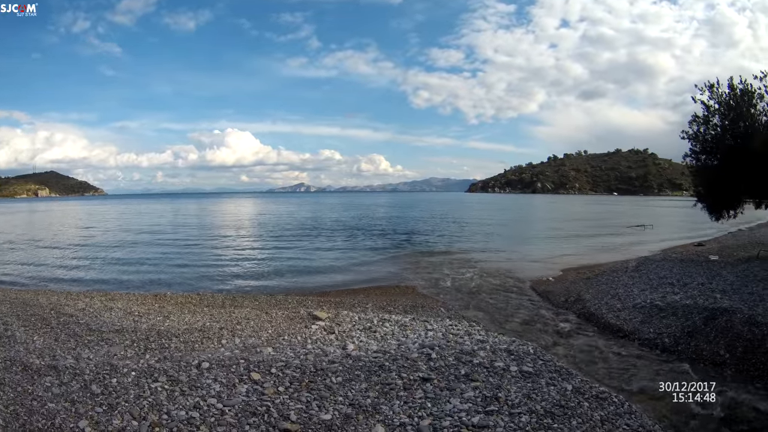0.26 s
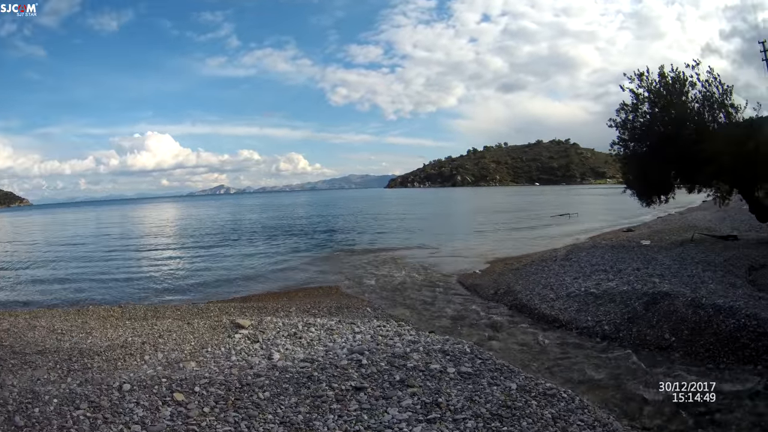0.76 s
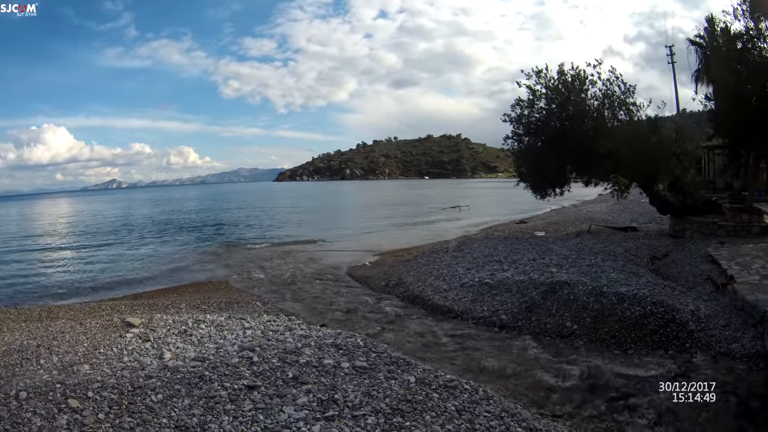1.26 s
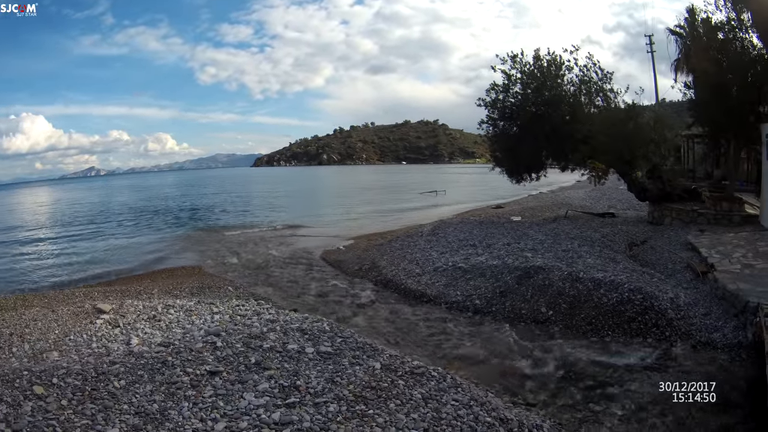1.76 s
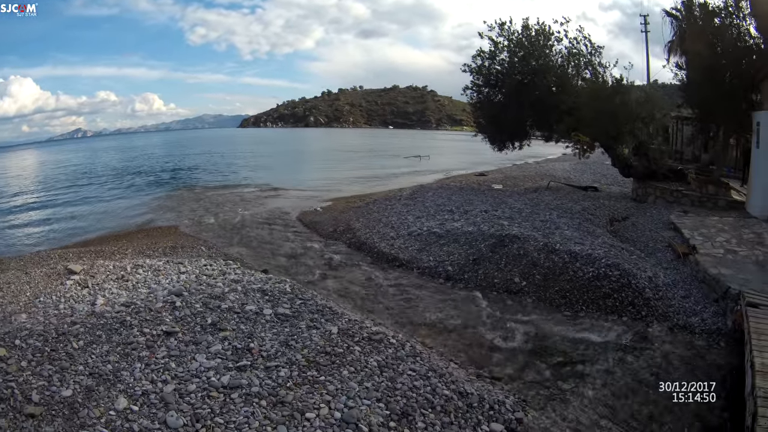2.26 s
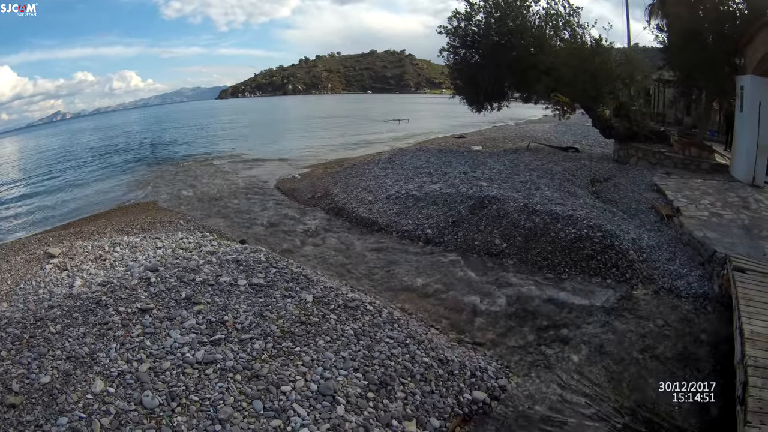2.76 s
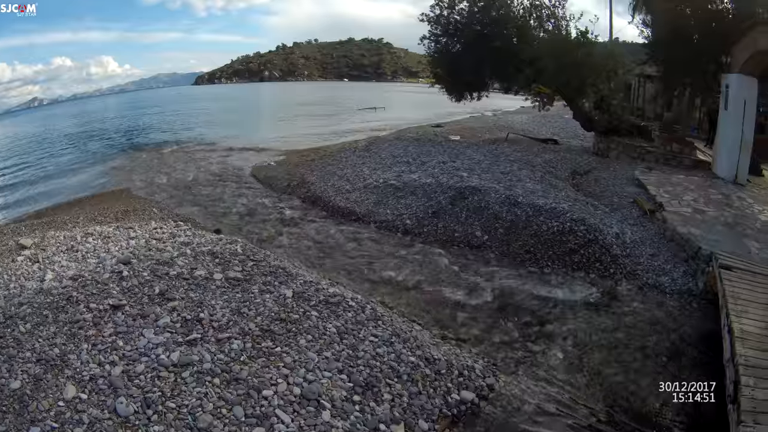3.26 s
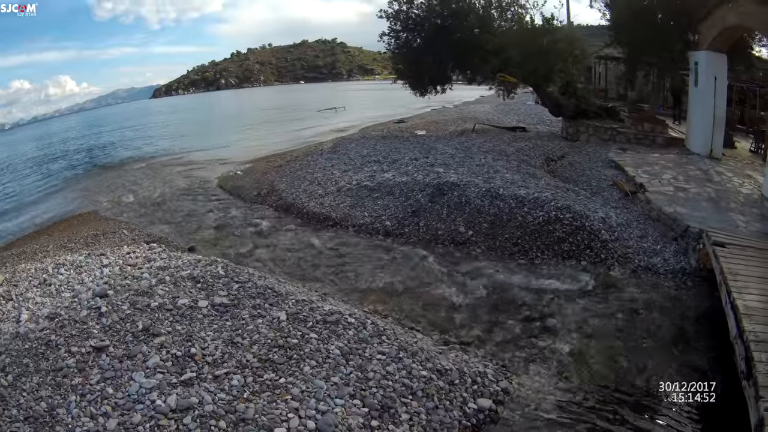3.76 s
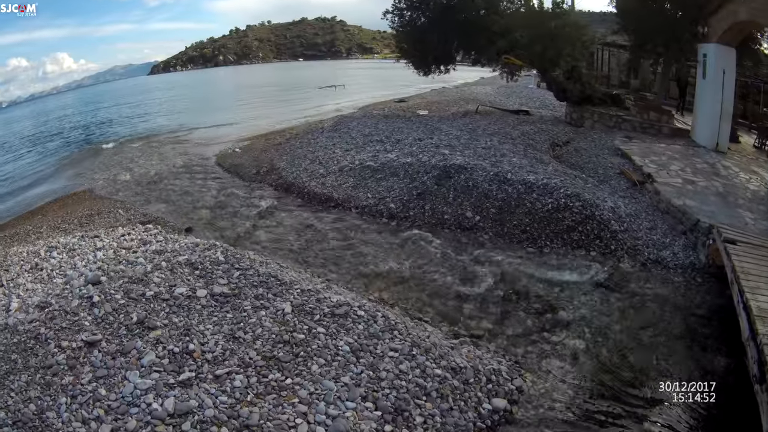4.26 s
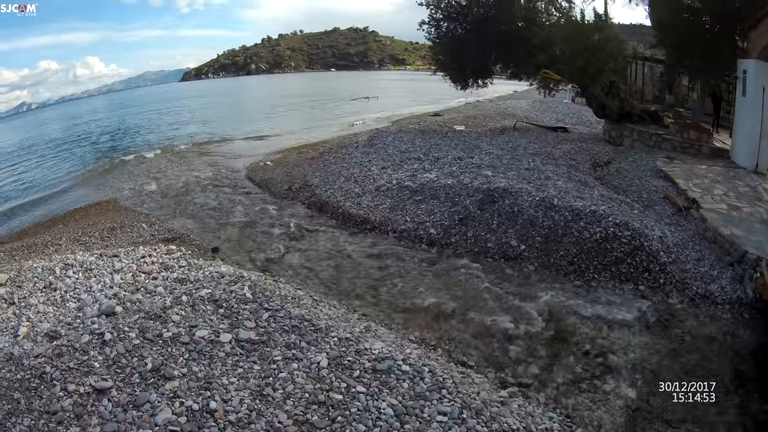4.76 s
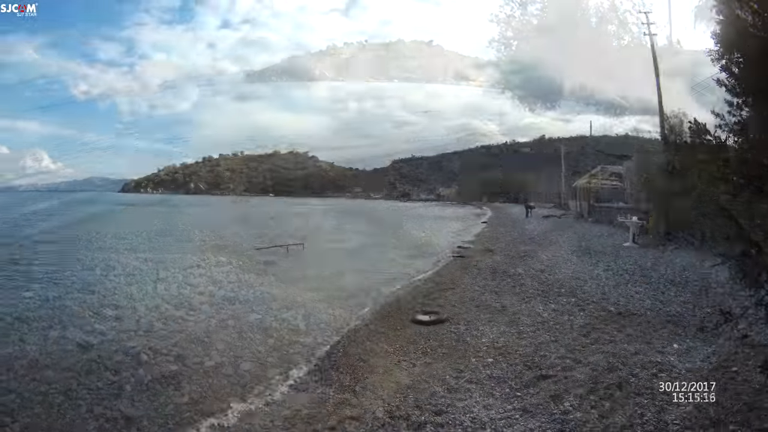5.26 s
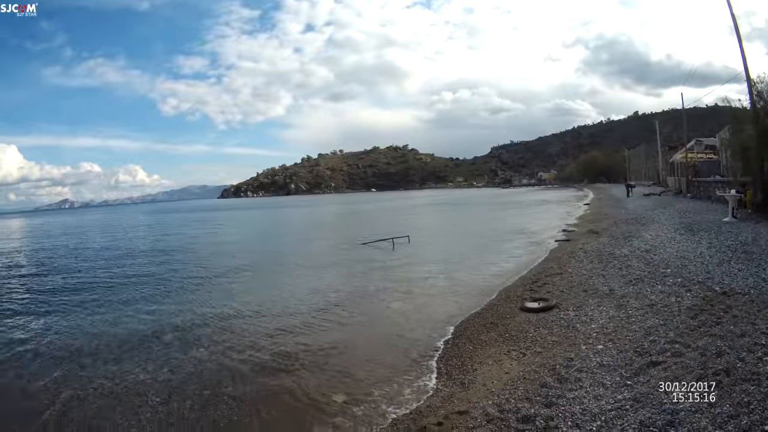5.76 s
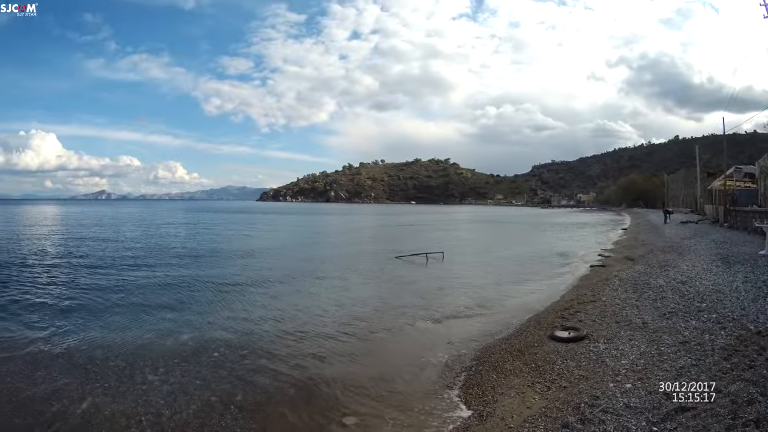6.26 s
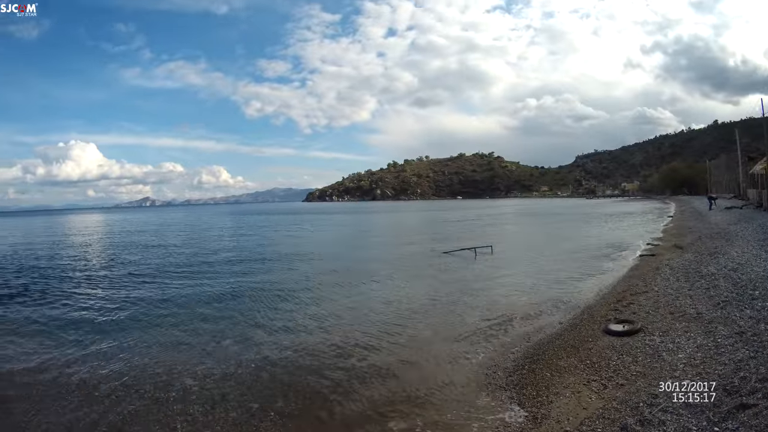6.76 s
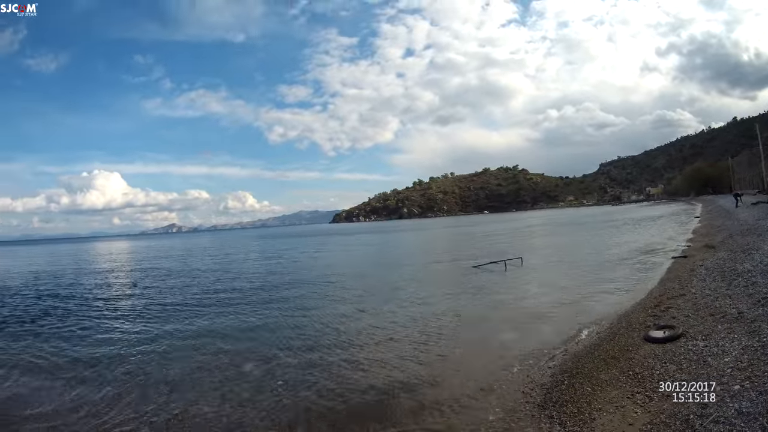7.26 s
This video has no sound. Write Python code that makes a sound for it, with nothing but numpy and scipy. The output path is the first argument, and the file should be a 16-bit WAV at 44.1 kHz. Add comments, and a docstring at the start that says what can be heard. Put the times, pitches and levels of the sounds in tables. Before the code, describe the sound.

Close bubbling water rushes across gravel, casing clicks and hand rubs cutting through, before loud low wind buffeting takes over with faint wavelets behind.

```python
"""A small stream runs over pebbles into a calm sea, close to a hand-held camera: noise and dying bubble tones.
It fades out in a dissolve to a windy shore, where far wavelets lap faintly as patchy noise with a fizz.
Wind on the microphone port is low noise, light at first and strong on the shore.
At the camera body itself, ticks ring the casing, bumps swing it, and a hand rubs and squeaks on the plastic."""
import sys
import numpy as np
from scipy import signal
from scipy.fft import rfft, irfft
from scipy.io import wavfile
from scipy.ndimage import uniform_filter1d

SR = 44100
rng = np.random.default_rng(int(sys.argv[2]) if len(sys.argv) > 2 else 0)


def wav_out(sig):
    """Save sig, one row per channel (or a flat mono array), as 16-bit PCM at SR to the path in sys.argv[1]."""
    wavfile.write(sys.argv[1], SR, np.round(np.clip(np.atleast_2d(sig).T, -1, 1) * 32767).astype(np.int16))


N = 330750  # 7.5 s
HISS_TOP_HZ = 15330  # coloured noise stops here
EDGE_HZ = 16441  # band limit of the whole sound


def gain_of(db):
    """Amplitude factor of a level in dB."""
    return 10 ** (np.asarray(db) / 20)


def evened(x):
    """Scales a sound to an RMS of one."""
    return x / np.sqrt(np.mean(x ** 2) + 1e-20)


def smoothed(x, size):
    """Two running means in a row."""
    return uniform_filter1d(uniform_filter1d(x, size=size), size=size)


def read(points, hz):
    """Value of a spectrum, straight on a log-frequency axis."""
    f, value = np.transpose(points)
    return np.interp(np.log(hz + 1), np.log(f + 1), value)


def columns(rows):
    """Each column of a curve at every sample."""
    s, *rest = np.transpose(rows)
    return [np.interp(np.arange(N) / SR, s, c) for c in rest]


def add(mix, s, sound):
    """Adds a sound to the mix from s seconds on."""
    part = mix[round(s * SR):][:len(sound)]
    part += sound[:len(part)]


def coloured(x, points):
    """Shapes a flat sound to the spectrum points, at an RMS of one."""
    hz = np.fft.rfftfreq(N, 1 / SR)
    spectrum = rfft(x) * gain_of(read(points, hz)) * (hz < HISS_TOP_HZ)
    return evened(irfft(spectrum, N))


def tilted(x, hz, db):
    """Raises what lies above hz by the curve db."""
    low = signal.sosfiltfilt(signal.butter(2, hz, fs=SR, output="sos"), x)
    return low + gain_of(db) * (x - low)


def ringing(x, hz, width_hz):
    """One resonance."""
    return signal.lfilter(*signal.iirpeak(hz, hz / width_hz, SR), x)


def wash(patchy_db, flicker_db, size=256):
    """White noise with drifting patches and a flicker shared by all pitches."""
    frames = 4 * N // size + 5
    a, b, patches = rng.standard_normal((frames, size // 2 + 1, 3)).T
    patches = uniform_filter1d(patches, size=7, axis=0)  # across pitch
    patches = evened(uniform_filter1d(patches, size=24, axis=1))  # across time
    flicker = evened(uniform_filter1d(rng.standard_normal(frames), size=9))
    z = (a + 1j * b) * gain_of(patchy_db * patches + flicker_db * flicker)
    return evened(signal.istft(z, nperseg=size, noverlap=3 * size // 4)[1][:N])


def grains(per_s, spread_db, cycles, glide, low_hz, high_hz, count=26):
    """Short dying tones of many pitches at random moments, flat in sum; a few are large."""
    struck = rng.random(N) < per_s / SR
    size = gain_of(spread_db * np.minimum(rng.exponential(1, N), 4)) * struck
    kind, out = rng.integers(0, count, N), np.zeros(N)
    for k, hz in enumerate(np.geomspace(low_hz, high_hz, count)):
        turns = np.arange(0, 4 * cycles, hz / SR)
        tone = np.sin(2 * np.pi * turns * (1 + glide * turns / cycles))
        tone = tone * (1 - np.exp(-turns)) * np.exp(-2 * turns / cycles)
        tone = tone * np.sqrt(hz) / np.linalg.norm(tone)
        out += signal.oaconvolve(size * (kind == k), tone)[:N]
    return evened(out)


# The far shore. Each row: time in seconds, level in dB, fizz above 650 Hz against the low wash in dB.
SHORE_LEVELS = [(4.95, -45, 0), (5.3, -32, 29), (5.55, -31.5, 7), (5.75, -33, 2), (5.9, -40, 2),
                (6.15, -36.5, 3), (6.45, -40, 2), (6.71, -37, 0), (6.95, -45, -11), (7.19, -31, 0),
                (7.23, -41, -2), (7.5, -41.5, -3)]
# Spectrum of the wavelets. Each row: frequency in Hz, relative level in dB per Hz.
SHORE_SPECTRUM = [(240, -22), (400, -5.5), (585, -8.5), (982, -5.5), (1040, -7.5), (1270, -10), (1830, -9),
                  (2170, -3.5), (3750, -6), (5000, -3), (13300, -29.5), (15200, -32)]


def shore():
    """Wavelets on gravel, far and soft: patchy noise and a fizz of small dying tones."""
    fizz = grains(per_s=1200, spread_db=2.5, cycles=4.4, glide=.03, low_hz=800, high_hz=13500)
    water = wash(patchy_db=2.45, flicker_db=1.0) + gain_of(-8) * fizz
    level_db, fizz_db = columns(SHORE_LEVELS)
    # the fizz keeps its level and the low wash moves against it
    water = tilted(coloured(water, SHORE_SPECTRUM), 650, fizz_db) / gain_of(fizz_db)
    begun = np.arange(N) > SHORE_LEVELS[0][0] * SR
    return gain_of(level_db) * begun * water


# Bumps on the camera body. Each row: start in seconds, level in dB,
# pitch of the swing in Hz, time for the swing to die by 60 dB in seconds.
BODY_BUMPS = [(0.539, -21.5, 61, 0.05), (1.289, -33, 50, 0.074), (1.689, -28, 48, 0.098)]


def bumps():
    """A quick push, then a low swing of the body."""
    out, t = np.zeros(N), np.arange(6000) / SR
    for s, db, hz, t60 in BODY_BUMPS:
        push = 4.2 * np.sin(2 * np.pi * 150 * t) * np.exp(-t / 0.0014)
        decay = gain_of(-60 * np.maximum(t - .02, 0) / t60)
        swing = -np.sin(2 * np.pi * hz * t) * (1 - np.exp(-t / 0.01)) * decay
        add(out, s, gain_of(db) * (push + swing))
    return out


# Thin squeaks close at the casing. Each row: start in seconds, peak in dB, pitch in Hz, length in seconds.
SKIN_SQUEAKS = [(4.396, -48, 11200, 0.01), (5.94, -42, 13300, .03)]


def squeaks():
    """Skin squeaks on plastic: a short high sine that swells and fades."""
    out = np.zeros(N)
    for s, db, hz, length in SKIN_SQUEAKS:
        t = np.arange(0, length, 1 / SR)
        add(out, s, gain_of(db) * np.sin(2 * np.pi * hz * t) * np.hanning(len(t)))
    return out


# Ticks of the casing, right at the microphone. Each row: start in seconds, peak in dB,
# pitch in Hz, bare slips against the ring in dB.
CASING_TICKS = [(0.557, -14, 4340, -7), (0.6035, -9.5, 4000, -10), (0.726, -14, 4610, -14),
                (1.119, -11, 3140, -14), (1.2136, -14, 6190, -15), (1.229, -10, 4010, 0),
                (1.7592, -11, 2600, 6), (1.848, -16, 4170, 3), (1.9558, -13, 2640, -17),
                (2.693, -10.5, 4200, -21), (3.279, -11.5, 3950, -13), (3.807, -11, 4400, -17),
                (4.1964, -3.5, 5360, -24), (4.2122, -7, 5500, -20), (4.2313, -13, 5050, -10),
                (4.2504, 0, 4890, -8), (4.28, -17.5, 4270, -13), (4.3081, -20, 4230, -10),
                (4.3924, -4, 4330, -21), (4.4744, -15, 4200, -10), (4.4862, -1.2, 4280, -3),
                (4.5348, -9, 4080, -14), (4.572, -15, 4900, -16), (4.6351, -5, 4100, 13),
                (4.69, -15, 4520, -4), (4.7326, -11, 4800, -15), (4.7647, -13, 4700, -14),
                (4.8148, -8.5, 4670, -13), (4.9042, -11, 4640, -16), (5.492, -17, 4540, -12),
                (6.0312, -15, 4700, -10), (6.3465, -24, 5170, -12), (7.295, -22.5, 4690, 1),
                (7.3188, -30, 4970, 3), (7.344, -26, 4200, 0), (7.3913, -18, 4380, -11),
                (7.4098, -29, 2500, 8), (7.467, -29, 4560, 2), (7.489, -18, 4670, -16)]
# Resonances of the casing. Each row: factor on the tick's pitch, width in Hz, level in dB.
CASING_MODES = [(1.025, 420, 16.5), (1.19, 1000, 9), (1.37, 340, -5), (1.75, 1400, -5)]
TICK_T60_S, TICK_RISE_S = 0.0084, 0.00045  # how the flurry of slips dies by 60 dB and sets in


def ticks():
    """A quick flurry of slips rings the plastic casing; the first slips are also heard bare."""
    out, t = np.zeros(N), np.arange(1300) / SR
    flurry = gain_of(-60 * t / TICK_T60_S) * (1 - np.exp(-t / TICK_RISE_S)) ** 2
    bare_band = signal.butter(2, (2500, 10500), "band", fs=SR, output="sos")
    noises = rng.standard_normal((len(CASING_TICKS), len(t)))
    for (s, db, hz, bare_db), noise in zip(CASING_TICKS, noises):
        slips = noise * flurry
        ring = np.zeros(len(t))
        for factor, width_hz, mode_db in CASING_MODES:
            mode = ringing(slips, hz * factor, width_hz)
            ring += gain_of(mode_db) * ringing(mode, hz * factor, 2.7 * width_hz)
        bare = signal.sosfilt(bare_band, slips * np.exp(-t / 0.00028))
        tick = ring / abs(ring).max() + gain_of(bare_db) * bare / abs(bare).max()
        add(out, s, gain_of(db) * tick / abs(tick).max())
    return out


# Rubs of the hand along the casing. Each row: start in seconds, length in seconds, rise in seconds,
# first level in dB, last level in dB, treble above 5 kHz against the level in dB.
HAND_RUBS = [(.53, 0.11, .003, -32, -26, -6), (0.698, 0.037, .003, -22, -35, -9),
             (1.086, 0.1, .025, -18.5, -34, -2.5), (1.217, 0.035, .003, -38, -30, -7),
             (3.267, 0.032, 0.016, -30, -29, 6), (4.192, 0.039, .005, -22, -36, 3),
             (4.424, 0.064, .003, -44, -9, -7), (5.757, 0.18, .045, -32, -44, 9),
             (5.919, .2, 0.035, -27.5, -30.5, -4), (6.193, 0.041, .012, -24.5, -34.5, 1.5),
             (6.714, 0.49, 0.0067, -28.5, -31.5, -2)]
# Spectrum of skin on the casing. Each row: frequency in Hz, relative level in dB per Hz.
RUB_SPECTRUM = [(290, -19), (500, -14), (824, -11.5), (1050, -14.5), (1250, -15), (2980, -8.5), (3300, -12),
                (4850, 0), (6010, -7), (10500, -18), (15200, -32)]
LIFT_S, RUB_FLUTTER_DB = 0.008, 1.5  # how fast the skin lifts; how unevenly it presses


def rubs():
    """Skin slips on plastic: dense tiny clicks in a hiss, stopping quickly as the skin lifts."""
    slips = grains(per_s=2100, spread_db=2.5, cycles=1.2, glide=.01, low_hz=1490, high_hz=13900)
    skin = coloured(wash(patchy_db=2.0, flicker_db=-0.5) + gain_of(-7.0) * slips, RUB_SPECTRUM)
    flutter = evened(smoothed(rng.standard_normal(N), 600))
    stroke, treble_db, t = np.zeros(N), np.zeros(N), np.arange(N) / SR
    for s, length, rise, first_db, last_db, bright_db in HAND_RUBS:
        touch = np.clip(np.minimum((t - s) / rise, (s + length - t) / LIFT_S), 0, 1)
        stroke += touch * gain_of(np.interp(t, (s, s + length), (first_db, last_db)))
        treble_db += (touch > 0) * bright_db
    return stroke * gain_of(RUB_FLUTTER_DB * flutter) * tilted(skin, 5000, treble_db)


# Slow strength of the wind on the microphone port. Each row: time in seconds,
# level before the soft limit in dB, rumble above 103 Hz against the level in dB.
WIND_LEVELS = [(0, -51.5, 14), (.5, -45, 9), (1.1, -46.5, 4), (1.5, -42, -4), (2.0, -44, 3), (2.8, -47, 3),
               (3.3, -40, 4), (3.9, -42, -2), (4.25, -49, -3), (4.55, -33, 2), (4.95, -32, -5),
               (5.26, -19, 4.5), (5.52, -13.5, 10.5), (5.9, -11.5, -3.5), (6.2, -15, 10.5),
               (6.55, -13.5, -1), (6.8, -9, 0.5), (7.2, -13.5, 7), (7.5, -9.5, 2)]
# Spectrum of the wind. Each row: frequency in Hz, relative level in dB per Hz.
WIND_SPECTRUM = [(8.2, -58), (14, -1.5), (38, 6.5), (65, -1), (83, -6), (225, -30), (252, -32.5),
                 (302, -40.5), (378, -45), (400, -49), (520, -82), (880, -120)]
# Short swells of the low wind rumble. Each row: middle in seconds,
# peak level before the soft limit in dB, length in seconds.
RUMBLE_SWELLS = [(0.133, -34, .12), (0.58, -33, .08), (1.292, -29, 0.11), (1.41, -31.5, 0.13),
                 (1.738, -33, 0.25), (2.05, -30, 0.091), (2.214, -35, 0.077), (2.558, -36, 0.081),
                 (2.705, -38, .14), (3.18, -39, 0.14), (4.02, -33, 0.12), (4.397, -31, 0.25),
                 (4.59, -23, 0.073), (4.703, -24.5, 0.17), (4.85, -24.5, 0.14), (5.532, -17, 0.068),
                 (5.66, -10, .12), (5.766, -14, 0.043), (5.853, -16, 0.14), (5.972, -8, 0.067),
                 (6.094, -5, 0.11), (6.243, -8, 0.047), (6.417, -7, .08), (6.49, -12, 0.081),
                 (6.611, -12, 0.047), (7.07, -4, 0.047), (7.199, -1.5, 0.08), (7.4, -13.5, .16)]
SWELL_UPPER_DB = -13  # a swell's rumble above 77 Hz against its level
SOFT_LIMIT = 0.75  # level at which the wind's peaks are softly rounded


def wind():
    """Eddies push on the port: lumpy low noise with an upper rumble, its peaks softly rounded."""
    level_db, upper_db = columns(WIND_LEVELS)
    swells = np.zeros(N)
    for s, db, length in RUMBLE_SWELLS:
        add(swells, s - length / 2, gain_of(db) * np.hanning(round(length * SR)))
    # the last point sets a faint floor above the rumble
    eddies = coloured(rng.standard_normal(N), WIND_SPECTRUM + [(900, -93)])
    size = np.sqrt(abs(smoothed(eddies ** 2, 2000)))
    eddies = evened(eddies / (size + 0.13) ** 0.47)  # chance swings in size are partly evened
    lumps_db = 1.5 * evened(smoothed(rng.standard_normal(N), 1500))  # small eddies come in lumps
    slow = gain_of(level_db) * tilted(eddies, 103, upper_db)
    pushed = slow + swells * tilted(eddies, 77, SWELL_UPPER_DB)
    return tilted(SOFT_LIMIT * np.tanh(pushed / SOFT_LIMIT), 140, lumps_db)


# The clearest bubbles, near the microphone. Each row: start in seconds,
# level before the rise and decay in dB, starting pitch in Hz.
CLEAR_BUBBLES = [(0.159, -20, 990), (0.305, -22, 930), (0.364, -25.5, 500), (0.6, -25, 500),
                 (0.627, -19, 1580), (0.716, -23, 840), (0.796, -19, 1600), (1.146, -15, 1700),
                 (1.189, -22, 508), (1.286, -20, 1680), (1.326, -20, 1650), (1.421, -15, 1570),
                 (1.493, -16, 1420), (1.551, -14, 2180), (1.664, -22, 656), (1.776, -14, 2680),
                 (2.108, -17, 2600), (2.17, -16, 2600), (2.317, -17, 1700), (2.476, -20, 855),
                 (2.756, -16, 1560), (3.332, -15, 1640), (3.539, -19, 1540), (3.635, -19, 1470),
                 (3.826, -18, 1490), (3.884, -21, 930), (3.992, -17.5, 907), (4.05, -17, 1570),
                 (4.387, -19.5, 770), (4.528, -22, 695), (4.623, -23, 775), (4.673, -18, 1800),
                 (4.993, -20, 1190), (5.735, -25, 2900)]


def bubbles():
    """Each trapped bubble rings a few cycles, rising in pitch."""
    out = np.zeros(N)
    for s, db, hz in CLEAR_BUBBLES:
        turns = np.arange(0, 30, hz / SR)
        tone = np.sin(2 * np.pi * turns * (1 + 0.0028 * turns))
        add(out, s, gain_of(db) * tone * (1 - np.exp(-turns / 1.3)) * np.exp(-turns / 4.6))
    return out


# The stream over pebbles, close by, until it fades out. Each row: time in seconds, level in dB.
STREAM_LEVELS = [(0, -28), (.75, -26), (1.0, -27), (1.15, -25.5), (1.9, -23.5), (2.3, -25.5), (2.7, -24.5),
                 (3.5, -24), (4.2, -25.5), (4.6, -24.5), (4.82, -22.5), (5.0, -24), (5.3, -28.5),
                 (5.5, -30), (5.56, -35)]
# Spectrum of the stream. Each row: frequency in Hz, relative level in dB per Hz.
STREAM_SPECTRUM = [(82, -53), (140, -13), (295, -14.5), (412, -7), (482, -7.5), (885, -2.5), (1120, -6),
                   (1530, -2.5), (2360, -3.5), (2710, 0.5), (3230, -2), (4590, 1.5), (8950, -13.5),
                   (15200, -29)]
# The stream's level dips briefly after the two loudest ticks. Each row: start in seconds, depth in dB.
LEVEL_DIPS = [(4.254, 10), (4.495, 1.5)]
DIP_S, DIP_TREBLE_SHARE = 0.084, 0.65  # time to come back; share of the dip that the treble is spared
STREAM_TREBLE_DB = -0.66  # above 3.5 kHz, against the level


def stream():
    """A blur of far bubbles, near ones that stand out, a few that gurgle, and splashes that crackle."""
    level_db, = columns(STREAM_LEVELS)
    t = np.arange(N) / SR
    dip_db = np.zeros(N)
    for s, db in LEVEL_DIPS:
        dip_db += db * (t > s) * np.clip(1 - ((t - s) / DIP_S) ** 2, 0, 1)
    far = wash(patchy_db=1.3, flicker_db=1.28)
    near = grains(per_s=2500, spread_db=3.5, cycles=6.2, glide=0.089, low_hz=297.8, high_hz=14100)
    gurgle = grains(per_s=450, spread_db=1.5, cycles=6.85, glide=0.084, low_hz=215.6, high_hz=2190)
    crackle = grains(per_s=640, spread_db=1.5, cycles=0.67, glide=.01, low_hz=2500, high_hz=13700)
    water = far + gain_of(-5) * near + gain_of(-14.0) * gurgle + gain_of(-16.0) * crackle
    treble_db = STREAM_TREBLE_DB + DIP_TREBLE_SHARE * dip_db
    water = tilted(coloured(water, STREAM_SPECTRUM), 3500, treble_db)
    fade = np.clip((STREAM_LEVELS[-1][0] - t) / 0.048, 0, 1)
    return gain_of(level_db - dip_db) * fade * water


def scene():
    """All sources summed to one channel."""
    at_camera = bumps() + squeaks() + ticks() + rubs() + wind()
    return (shore() + at_camera + bubbles() + stream())[None]


def record(dry):
    """The preamplifier rounds off the highest peaks; then the band limit."""
    over = .7 + .18 * np.tanh((abs(dry) - .7) / .18)
    rounded = np.where(abs(dry) < .7, dry, np.sign(dry) * over)
    band = signal.firwin(511, EDGE_HZ, window=("kaiser", 9), fs=SR)
    return signal.oaconvolve(rounded, band[None], "same")


dry = scene()
out = record(dry)
wav_out(out)
```